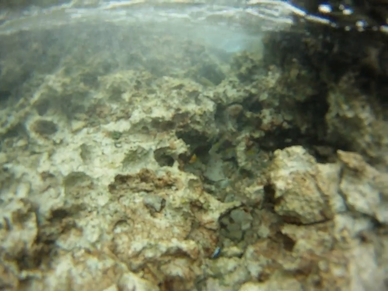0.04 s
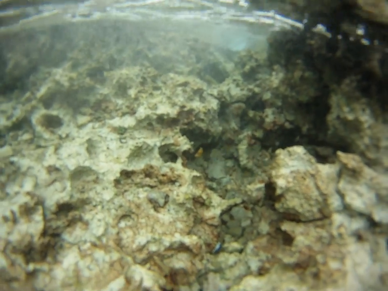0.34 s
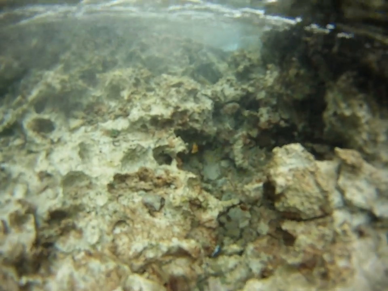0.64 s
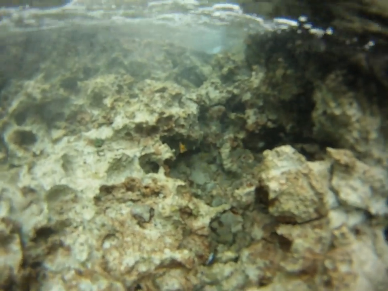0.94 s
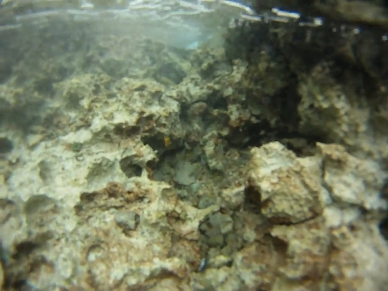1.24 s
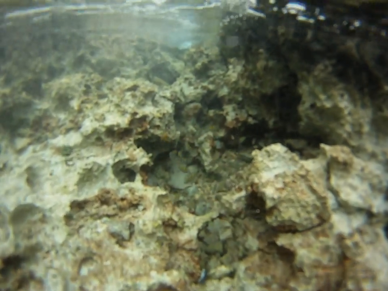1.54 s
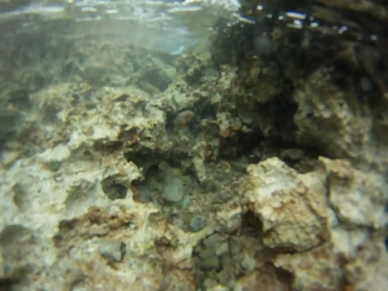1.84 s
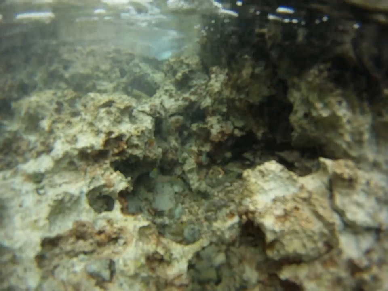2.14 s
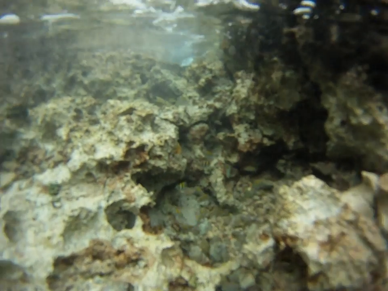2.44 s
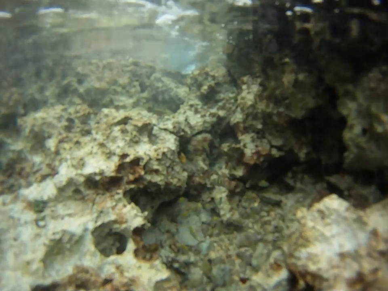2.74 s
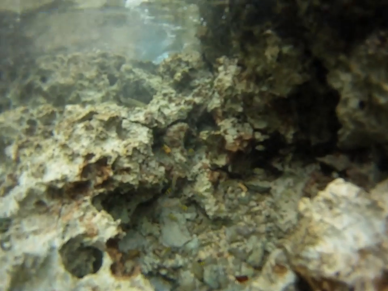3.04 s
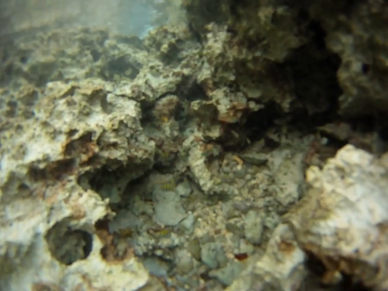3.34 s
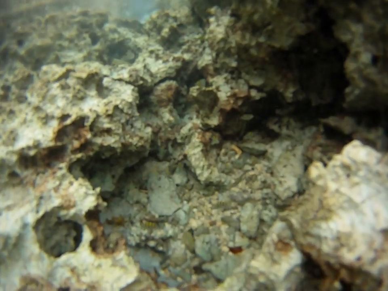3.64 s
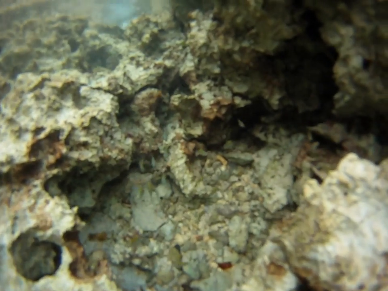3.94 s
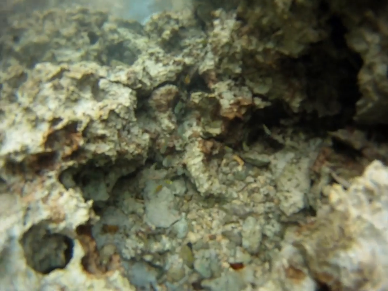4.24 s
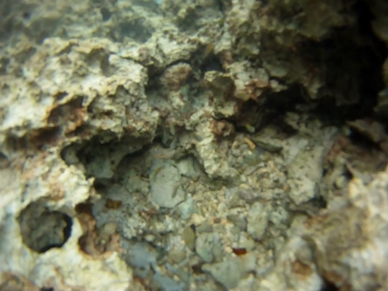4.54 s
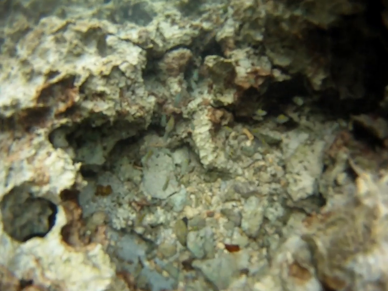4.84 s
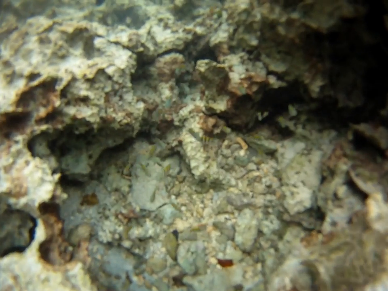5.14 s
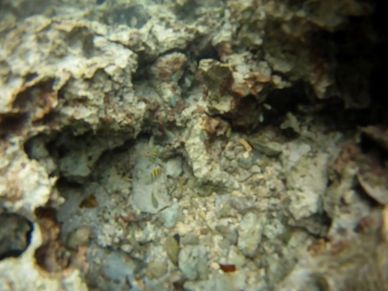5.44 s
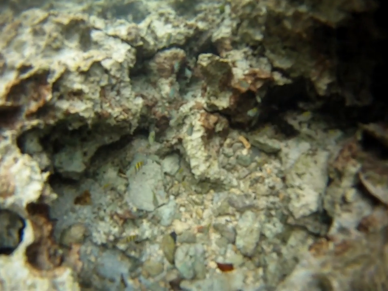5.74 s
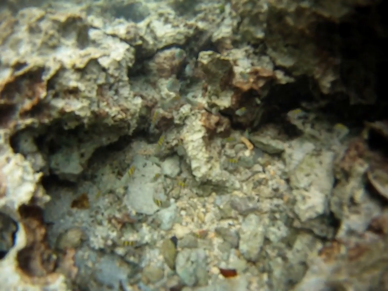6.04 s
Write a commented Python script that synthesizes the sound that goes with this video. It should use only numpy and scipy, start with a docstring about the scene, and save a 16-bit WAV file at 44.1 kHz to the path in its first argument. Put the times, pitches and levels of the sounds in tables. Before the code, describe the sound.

A faint low wash with a smooth hiss runs for the whole six seconds, heard under water in a rocky pool from inside a waterproof housing. A fine fizz and a few light ticks open the sound. At about 0.8 seconds one hard, slightly distorted snap hits the housing, by far the loudest event. Sharp clicks, dull knocks and hollow pops cluster around it until 1.5 seconds, each close and very short, with a thin, bright ring. The fizz fades from 1.2 seconds. Near 1.85 seconds the hand's grip rubs and creaks briefly, followed by a couple of clicks and a low bump at 2.2 seconds. A faint pop comes at 2.5 seconds and a soft knock at 3.2. A second low bump lands at 4.1 seconds. After that only the quiet wash and a soft rumble of swaying water remain.

```python
"""A camera in a waterproof housing is held under water over a rocky pool, in a low wash and fine fizz.
The grip rubs and knocks; sharp clicks and hollow pops ring the shell, and the 12 kHz sound circuit
mirrors each ring into the treble. At 0.76 s a hard snap overloads it. The fizz fades from 1.2 s.
The grip creaks at 1.85 s and bumps hardest at 2.2 s and 4.1 s; the wash and swaying water remain."""
import sys
import numpy as np
from scipy import signal
from scipy.fft import rfft, irfft
from scipy.io import wavfile
from scipy.ndimage import uniform_filter1d

SR = 44100
rng = np.random.default_rng(int(sys.argv[2]) if len(sys.argv) > 2 else 0)


def waveform_to_disk(signal):
    """Save audio, clipped to [-1, 1], as 16-bit WAV at the path in sys.argv[1]."""
    frames = np.transpose(np.atleast_2d(signal))
    scaled = np.clip(frames, -1, 1) * 32767
    samples = np.round(scaled).astype(np.int16)
    wavfile.write(sys.argv[1], SR, samples)


N = 272538
TIME_S = np.arange(N) / SR
HOLD_HZ, TOP_HZ = 12000, 15200


def undb(db):
    """Decibels to gain."""
    return 10 ** (np.asarray(db) / 20)


def level(x, db):
    """Scale to an rms level."""
    return x * undb(db) / np.sqrt(np.mean(x ** 2))


def butter(x, hz, kind, order=2):
    """Low-, high- or band-pass."""
    return signal.sosfilt(signal.butter(order, hz, kind, fs=SR, output="sos"), x)


def add(out, start_s, x):
    """Mix in a short sound."""
    start = max(int(start_s * SR), 0)
    out[start:start + len(x)] += x[:N - start]


def drift(rate_hz):
    """Slow random curve, spread near 1."""
    hold = int(SR / rate_hz)
    return uniform_filter1d(np.repeat(rng.standard_normal(N // hold + 1), hold), hold)[:N]


# wash spectrum: freq_hz, relative_density_db
WASH_SPECTRUM = [(20, -4.5), (45, -6.5), (100, -11), (250, -12.5), (500, -16.5), (740, -18.5),
                 (1000, -25.5), (1400, -25), (2300, -29), (4000, -31.5), (5500, -36)]


def wash(level_db=-59, flicker_db=1.36, flicker_hz=13, split_hz=900):
    """A low wash wavers under a smooth hiss."""
    freq_hz, density_db = np.transpose(WASH_SPECTRUM)
    bins_hz = np.maximum(np.fft.rfftfreq(N, 1 / SR), 1)
    colour = undb(np.interp(np.log(bins_hz), np.log(freq_hz), density_db)) * (bins_hz < HOLD_HZ / 2)
    noise = irfft(rfft(rng.standard_normal(N)) * colour, N)
    steady = level(butter(noise, 6.8, "high"), level_db)
    flicker = undb(flicker_db * drift(flicker_hz)) - 1
    return steady + butter(steady, split_hz, "low", order=1) * flicker


# rumble envelope: time_s, level_db
SWAY_LEVELS = [(0, -59.5), (.4, -67), (.8, -61.5), (1.4, -67), (2.0, -59), (2.5, -68), (4.1, -63),
               (4.29, -52), (4.45, -65), (5.05, -68), (5.23, -58.5), (5.45, -67.5), (6.18, -67)]


def sway(low_hz=24, high_hz=62):
    """Water rumbles as it sways past the housing."""
    rumble = butter(butter(rng.standard_normal(N), high_hz, "low"), low_hz, "high")
    return level(rumble, 0) * undb(np.interp(TIME_S, *np.transpose(SWAY_LEVELS)))


# housing modes: pitch_hz, energy_db, t60_s
SHELL_MODES = [(300, -19.5, 0.015), (500, -12.5, 0.062), (755, 8, .024), (880, -5, 0.024),
               (1140, -10.5, .007), (1427, 0, 0.012), (1765, -3.5, .011), (2163, -3, 0.01),
               (2315, -2.5, .0155), (2770, -13, .009), (3520, -9.5, 0.0091), (3544, -3.5, 0.016),
               (4150, -15, 0.0034), (5100, -5.5, .005)]


def shell(tune=1., detune=0.):
    """Impulse response of the housing; a close pair of modes beats, so the main ring drops abruptly."""
    pitch_hz, energy_db, t60_s = np.transpose(SHELL_MODES)
    t = TIME_S[:SR // 20, None]
    decay = np.exp(-np.log(1000) * t / t60_s) / np.sqrt(t60_s)
    modes = np.sin(2 * np.pi * pitch_hz * tune * (1 + detune) * t)
    return (undb(energy_db) * decay * modes).sum(axis=1)


# grip slipping on the shell: start_s, length_s, rms_db, cutoff_hz
GRIP_RUBS = [(0.0, 0.051, -53, 870), (0.929, 0.017, -44, 980), (1.814, 0.081, -41.5, 900),
             (2.185, 0.048, -45, 416), (4.137, 0.019, -51, 2000)]


def rubs(slips_per_s=900, scatter_db=3, flex_gain=0.15):
    """The grip sticks and slips; the soft contact flexes the wall and stirs mostly its low modes."""
    out = np.zeros(N)
    for start_s, length_s, rms_db, cutoff_hz in GRIP_RUBS:
        n = int(length_s * SR)
        slips = (rng.random(n) < slips_per_s / SR) * undb(scatter_db * rng.standard_normal(n))
        slips *= signal.windows.tukey(n, .4)
        ring = signal.fftconvolve(slips, shell())
        wall = butter(np.pad(slips, (0, len(ring) - n)), [120, 350], "band")
        rub = butter(level(ring, 0) + flex_gain * level(wall, 0), cutoff_hz, "low", order=3)
        rub = butter(rub, 87, "high")
        add(out, start_s, rub * undb(rms_db) / np.sqrt(np.sum(rub ** 2) / n))
    return out


# limits of the shell's low, middle, main and high bands: edge_hz
BAND_EDGES_HZ = [290, 1000, 1880, 2750, 4900]


def shell_ring(push, tune, bands_db):
    """Where a blow lands sets how strongly each band rings; bands_db is energy as rms over 5 ms."""
    detune = .003 * rng.standard_normal(len(SHELL_MODES))
    ring = signal.fftconvolve(push, shell(tune, detune))
    out = 0
    for low_hz, high_hz, band_db in zip(BAND_EDGES_HZ, BAND_EDGES_HZ[1:], bands_db):
        band = butter(ring, [low_hz * tune, high_hz * tune], "band", order=4)
        out = out + band * undb(band_db) / np.sqrt(np.sum(band ** 2) / (SR / 200))
    return out


def fizz(ticks_per_s=2500, scatter_db=2.0, peak_s=1.18, peak_db=-61.3, floor_db=-85.5,
         swell_db_per_s=2.2, fade_db_per_s=21):
    """Dense tiny ticks, likely small bubbles, keep the shell ringing faintly, then fade to a floor."""
    ticks = (rng.random(N) < ticks_per_s / SR) * undb(scatter_db * rng.standard_normal(N))
    ticks *= rng.choice([-1, 1], N)
    ring = signal.fftconvolve(ticks, shell_ring([1.], tune=1.02, bands_db=[-5.5, -6.5, -2, -15]))[:N]
    since_s = TIME_S - peak_s
    envelope_db = peak_db + np.minimum(swell_db_per_s * since_s, -fade_db_per_s * since_s)
    return level(ring, 0) * undb(np.maximum(envelope_db, floor_db))


def hit(start_s, tune, bands_db, scrape_gain=0.01, scrape_s=0.00026, echo_gain=0.0037, echo_s=.007):
    """A sharp push with a brief scrape; nearby rocks scatter back a faint tail."""
    out, t = np.zeros(N), TIME_S[:SR // 20]
    envelope = scrape_gain * np.exp(-t / scrape_s) + echo_gain * np.exp(-t / echo_s)
    push = rng.standard_normal(len(t)) * envelope
    push[0] += 1
    add(out, start_s, shell_ring(push, tune, bands_db))
    return out


def hits(rows, balance_db, pivot_hz):
    """Blows of one kind share a band balance; harder contact tilts it to the treble about a pivot."""
    edges_hz = np.array(BAND_EDGES_HZ)
    octaves = np.log2(np.sqrt(edges_hz[:-1] * edges_hz[1:]) / pivot_hz)
    return sum(hit(start_s, tune, level_db + np.array(balance_db) + tilt_db_per_oct * octaves)
               for start_s, tune, level_db, tilt_db_per_oct in rows)


# grip knocks: start_s, pitch_ratio, level_db, tilt_db_per_oct
GRIP_KNOCKS = [(.014, .76, -51, 2), (.028, 1.06, -49, 4.5), (.7977, 1.12, -23.5, 5),
               (.9428, 0.98, -36, 1.5), (.9482, 1.01, -29.5, 0), (1.3255, 0.94, -48, -1),
               (1.8631, 1.03, -26.5, -1.5), (1.9587, 1.04, -47.5, 2), (2.2007, 0.94, -44, -1),
               (3.2224, 0.68, -41, 0), (4.1428, 1.07, -48, 4)]
# band balance: low_db, middle_db, main_db, high_db
KNOCK_BANDS_DB = [-0.5, -17.5, -21.5, -30.5]


def knocks():
    """Dull knocks of the grip ring mostly the low band."""
    return hits(GRIP_KNOCKS, KNOCK_BANDS_DB, pivot_hz=543)


def stray_ticks(ticks_per_s=6, thinning_s=3.0, start_db=-62, fade_db_per_s=2.8, scatter_db=2.5):
    """Faint lone ticks from the pool, fewer and weaker as the water settles."""
    onsets = rng.random(N) < ticks_per_s * np.exp(-TIME_S / thinning_s) / SR
    ticks = onsets * undb(start_db - fade_db_per_s * TIME_S + scatter_db * rng.standard_normal(N))
    return signal.fftconvolve(ticks, shell_ring([1.], tune=0.93, bands_db=[5, -3.0, 5.5, -0.5]))[:N]


# shell clicks: start_s, pitch_ratio, level_db, tilt_db_per_oct
SHELL_CLICKS = [(.157, 1.1, -49.5, -5.5), (.6445, 0.98, -47, -0.5), (.6953, 0.94, -48, -3.5),
                (.7026, 1.04, -48, -3.5), (.7103, 0.98, -45.5, -3.5), (.779, 1.04, -35, -1),
                (.7876, 1.03, -41, -3), (.7959, 1.06, -28, 0.5), (.9189, 1.023, -30, 2),
                (1.139, 1.06, -36.5, -2), (1.237, 1.1, -54, 1), (1.2735, 0.99, -27, 5),
                (1.4234, 1.03, -35, -2), (1.4455, 1.0, -31.5, 0), (1.9888, 1.05, -39.5, 0.5),
                (2.0083, 1.03, -35.5, 3)]
# band balance: low_db, middle_db, main_db, high_db
CLICK_BANDS_DB = [-14, -11.5, -.5, -4]


def clicks():
    """Sharp clicks ring mostly the main and high bands."""
    return hits(SHELL_CLICKS, CLICK_BANDS_DB, pivot_hz=2010)


# hollow pops: start_s, pitch_ratio, level_db, tilt_db_per_oct
HOLLOW_POPS = [(.2145, 1.09, -44.5, -1), (.3286, 1.22, -56.5, -2), (.6113, 0.85, -47, 5),
               (.957, 1.03, -44.5, -4), (1.2906, .94, -31, 1), (1.2923, 1.19, -36, -1),
               (1.4078, .8, -51.5, -6.5), (2.4991, 1.045, -53, 1), (3.2226, .98, -54, 4),
               (3.3993, .82, -61, 4)]
# band balance: low_db, middle_db, main_db, high_db
POP_BANDS_DB = [-17.5, -0.5, -1, -25]


def pops():
    """Hollow pops, likely bubbles bursting on the shell, ring mostly the middle and main bands."""
    return hits(HOLLOW_POPS, POP_BANDS_DB, pivot_hz=2000)


# shell snaps: start_s, pitch_ratio, level_db
SHELL_SNAPS = [(.757, .95, 1.5), (.8496, 1.0, -48)]
# band balance: low_db, middle_db, main_db, high_db
SNAP_BANDS_DB = [-40.5, -14, 0.5, -45.5]


def snaps():
    """One hard snap and one faint, nearly all main band."""
    return sum(hit(start_s, tune, level_db + np.array(SNAP_BANDS_DB))
               for start_s, tune, level_db in SHELL_SNAPS)


# pressure pulses from the hand: centre_s, peak_db, width_s
HAND_BUMPS = [(0.7969, -35.5, .0012), (1.969, -50, 0.0031), (2.1944, -33.5, 0.0025), (2.205, -21.5, .002),
              (2.2192, -31, 0.0016), (4.1431, -19.5, 0.0018)]


def bumps(low_hz=42, high_hz=500):
    """Pressure builds and lets go; the microphone passes no steady pressure, so it swings back."""
    pulses = sum(undb(peak_db) * np.exp(-np.abs(TIME_S - centre_s) / width_s)
                 for centre_s, peak_db, width_s in HAND_BUMPS)
    return -butter(butter(pulses, low_hz, "high"), high_hz, "low")


def creak(count=5, last_s=1.8545, last_db=-35.5, last_gap_s=.008, gap_ratio=1.5, build_db_per_s=230,
          tune=0.99, tune_spread=.04, tilt_db_per_oct=-1.0):
    """The grip gives way in small dull knocks, faster and harder up to the last."""
    gaps_s = last_gap_s * gap_ratio ** np.arange(count - 1)
    slips = []
    for lead_s in np.append(0, np.cumsum(gaps_s)):
        slip_tune = tune + tune_spread * rng.standard_normal()
        slips.append((last_s - lead_s, slip_tune, last_db - build_db_per_s * lead_s, tilt_db_per_oct))
    return hits(slips, KNOCK_BANDS_DB, pivot_hz=540)


def scene():
    """Everything reaches one microphone inside the housing."""
    mono = (wash() + sway() + rubs() + fizz() + knocks() + stray_ticks()
            + clicks() + pops() + snaps() + bumps() + creak())
    return np.array([mono, mono])


def record(dry, band_hz=5550, ceiling=0.98, hiss_db=-77):
    """The circuit samples, clips and holds, mirroring rings around 12 kHz; then hiss and a top cut."""
    narrow = signal.sosfilt(signal.ellip(8, .3, 50, band_hz, fs=SR, output="sos"), dry)
    sampled = signal.resample_poly(narrow, HOLD_HZ, SR, axis=1, window=("kaiser", 2))
    steps = np.repeat(np.clip(sampled, -ceiling, ceiling), 8, axis=1)
    held = signal.resample_poly(steps, SR, 8 * HOLD_HZ, axis=1)[:, :N]
    hiss = level(butter(rng.standard_normal((2, N)), 8000, "low"), hiss_db)
    return signal.sosfilt(signal.ellip(8, .2, 70, TOP_HZ, fs=SR, output="sos"), held + hiss)


dry = scene()
out = record(dry)
waveform_to_disk(out)
```